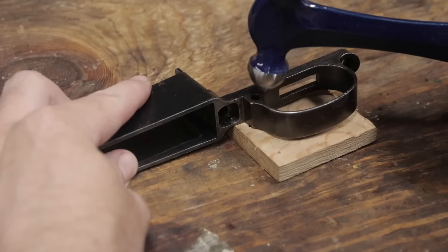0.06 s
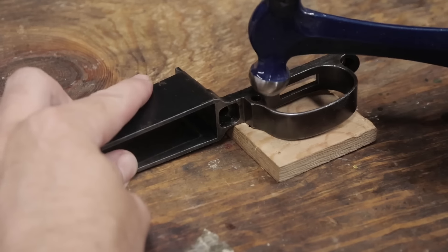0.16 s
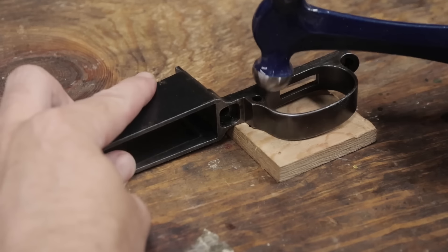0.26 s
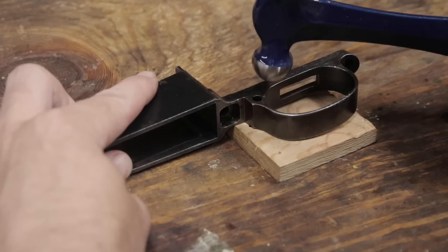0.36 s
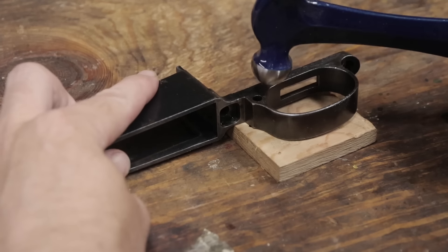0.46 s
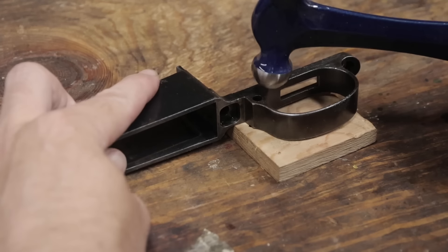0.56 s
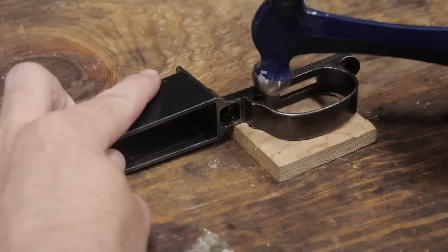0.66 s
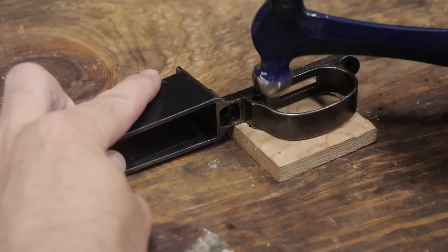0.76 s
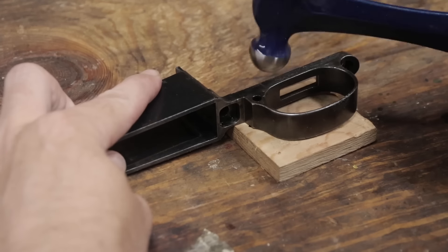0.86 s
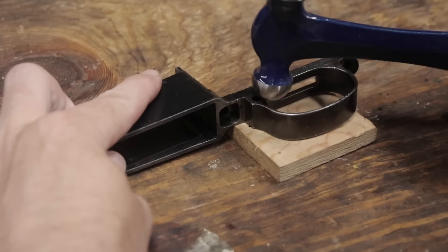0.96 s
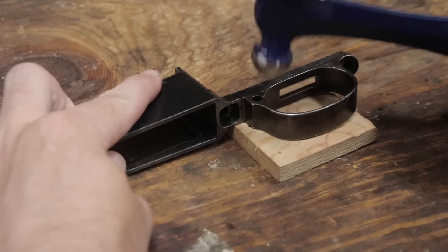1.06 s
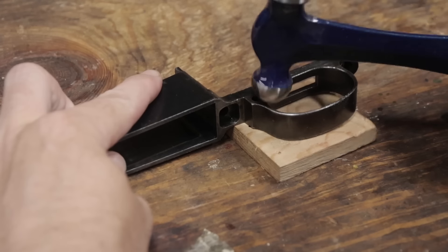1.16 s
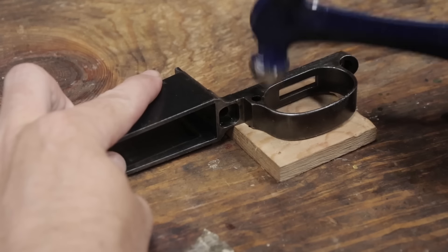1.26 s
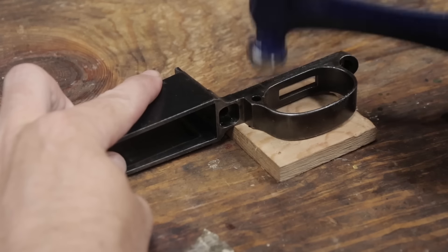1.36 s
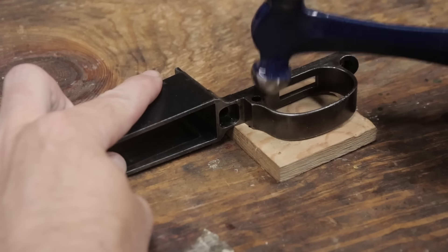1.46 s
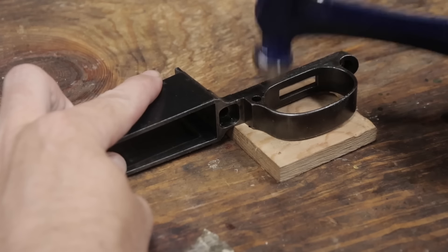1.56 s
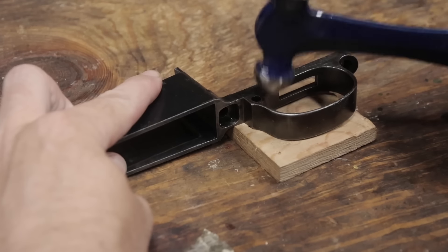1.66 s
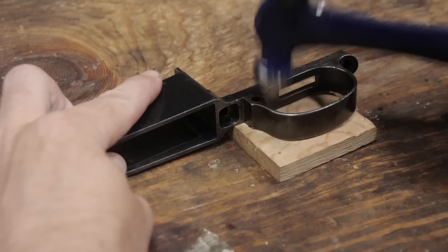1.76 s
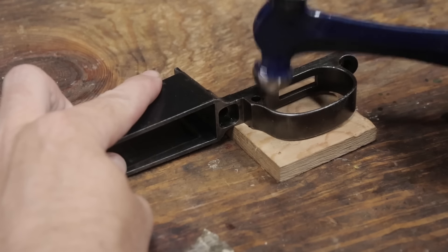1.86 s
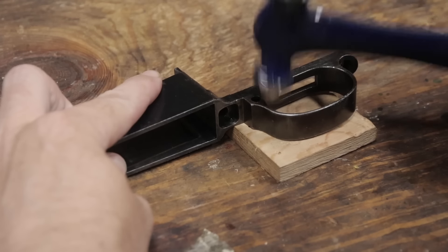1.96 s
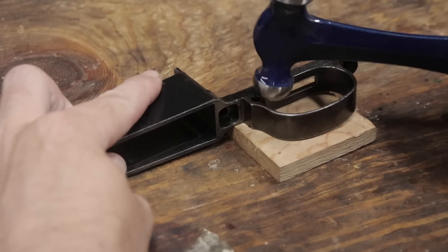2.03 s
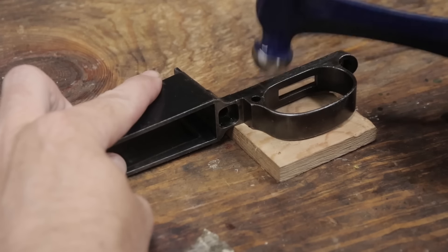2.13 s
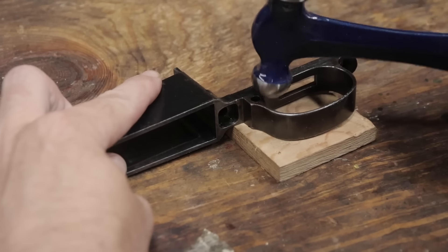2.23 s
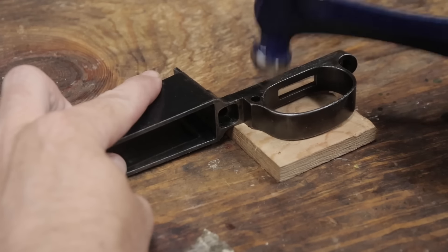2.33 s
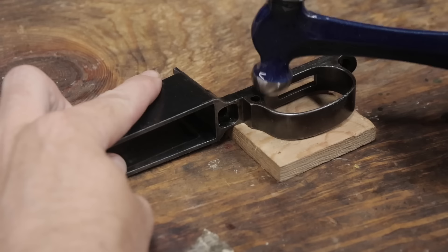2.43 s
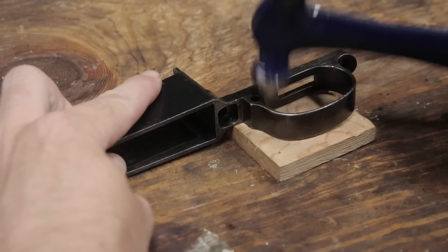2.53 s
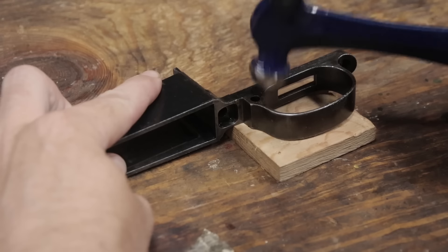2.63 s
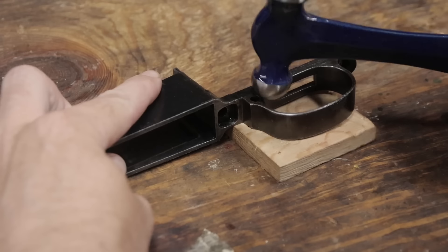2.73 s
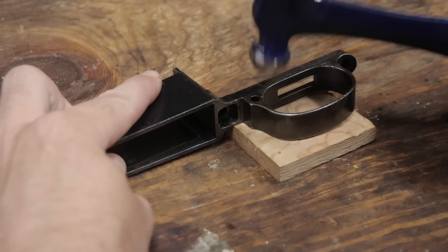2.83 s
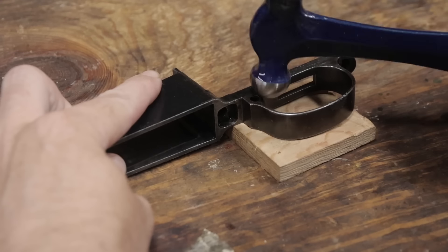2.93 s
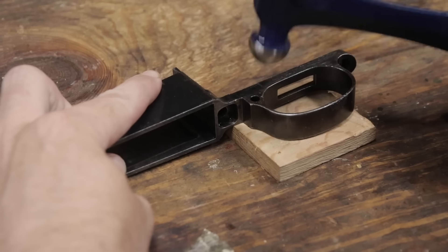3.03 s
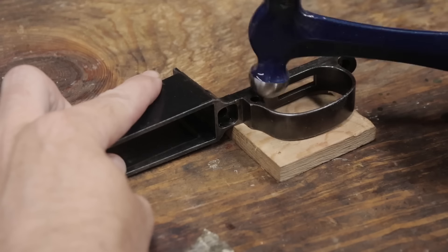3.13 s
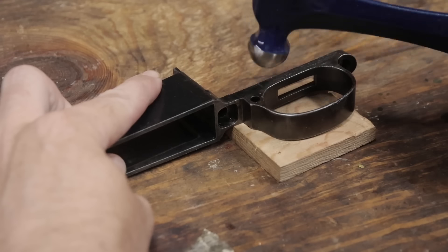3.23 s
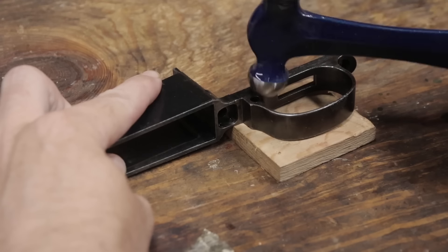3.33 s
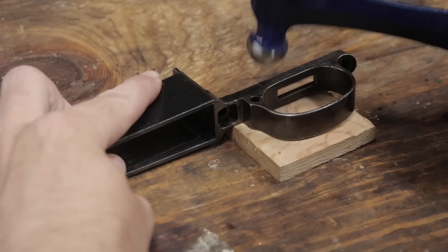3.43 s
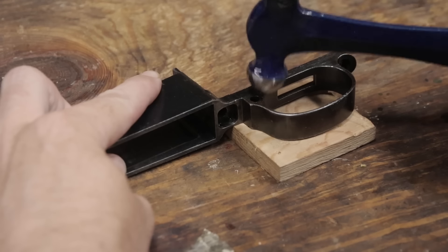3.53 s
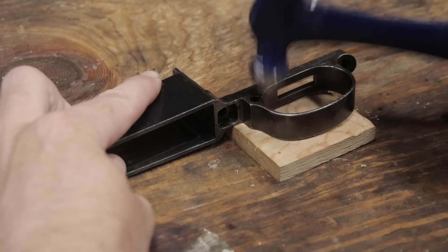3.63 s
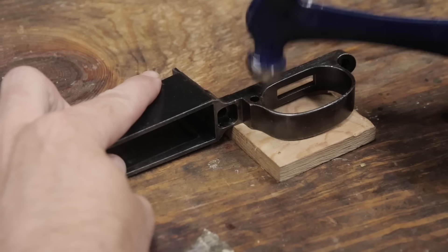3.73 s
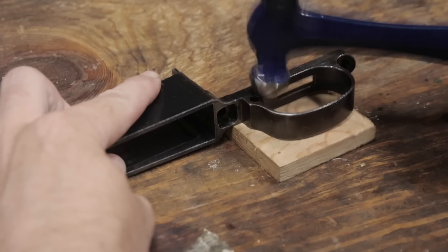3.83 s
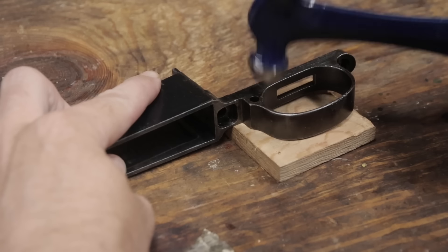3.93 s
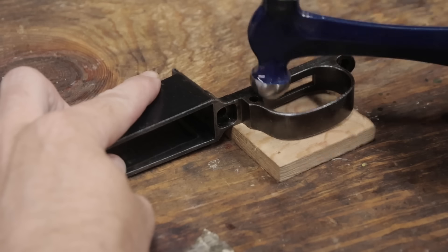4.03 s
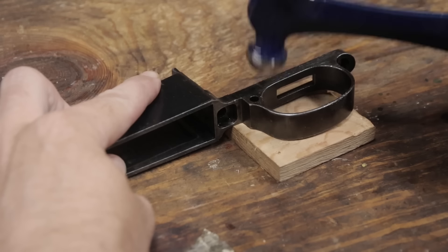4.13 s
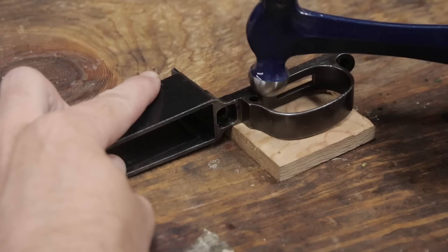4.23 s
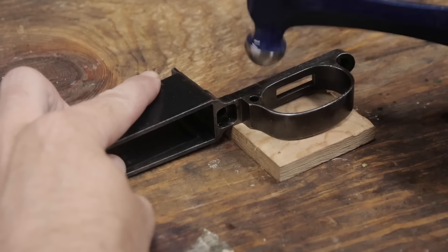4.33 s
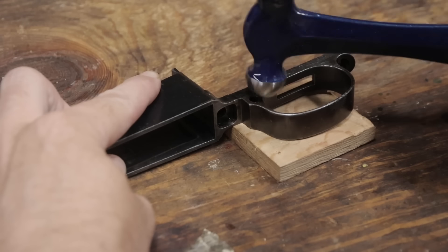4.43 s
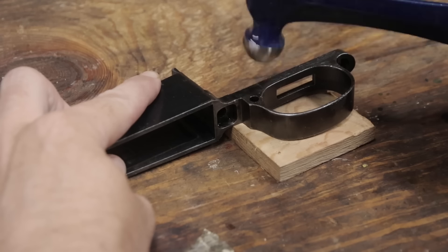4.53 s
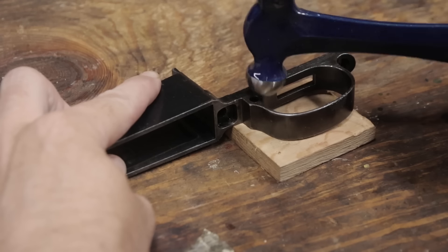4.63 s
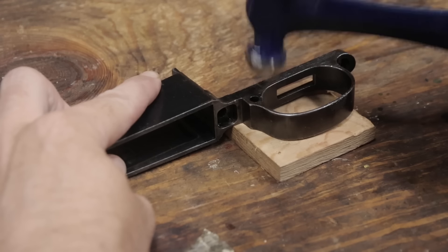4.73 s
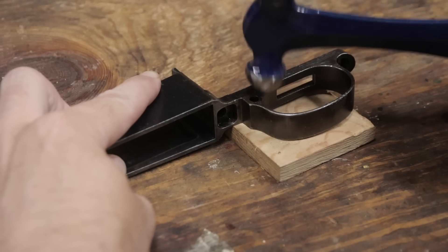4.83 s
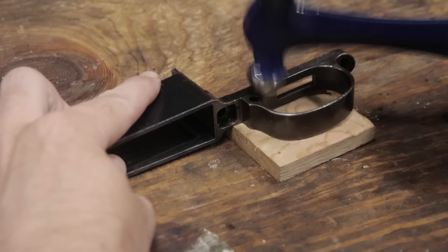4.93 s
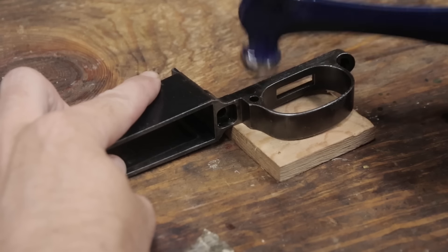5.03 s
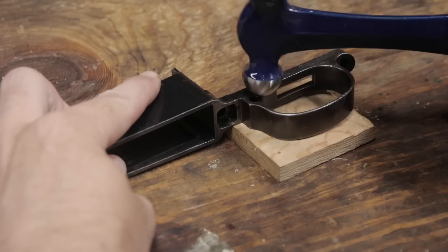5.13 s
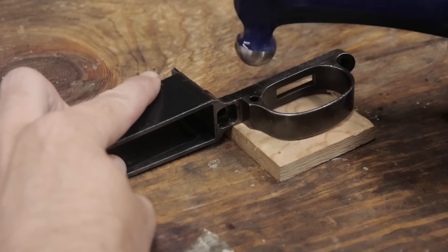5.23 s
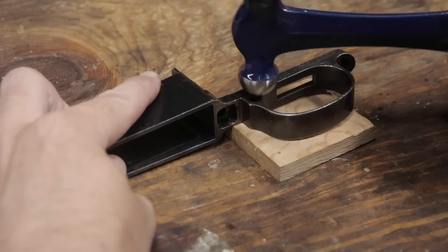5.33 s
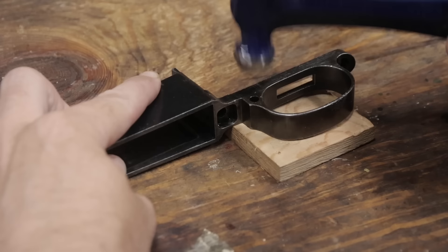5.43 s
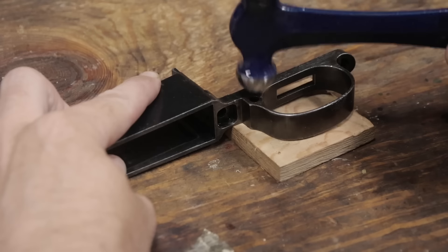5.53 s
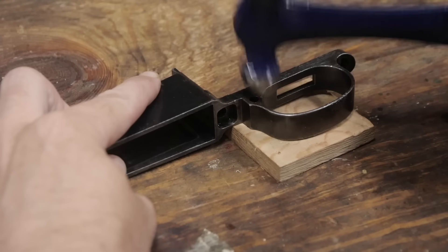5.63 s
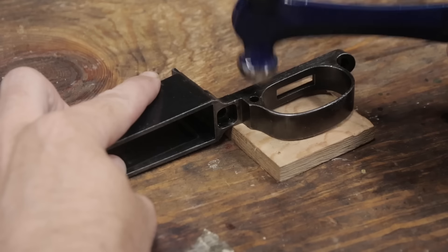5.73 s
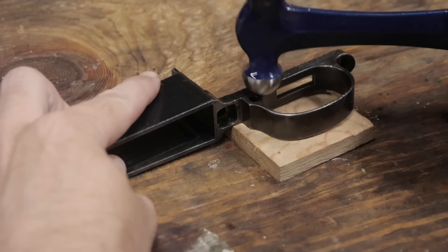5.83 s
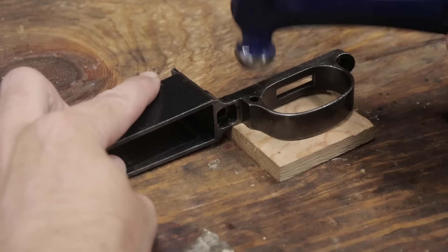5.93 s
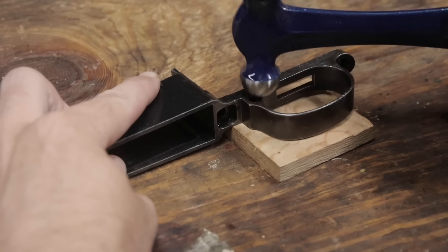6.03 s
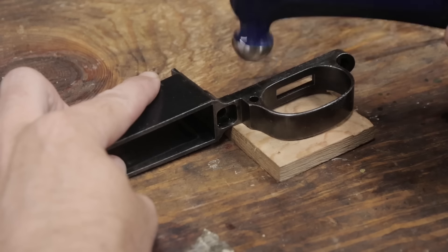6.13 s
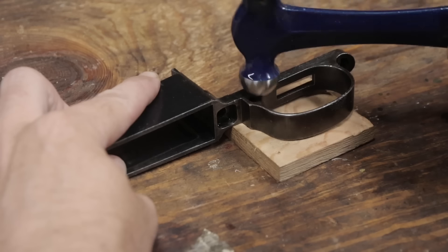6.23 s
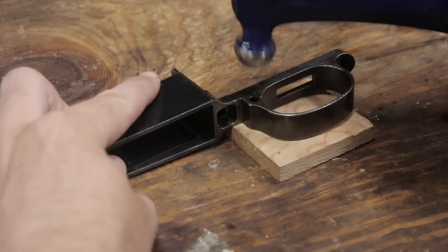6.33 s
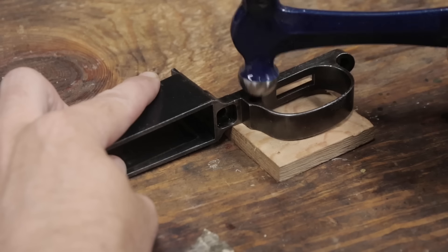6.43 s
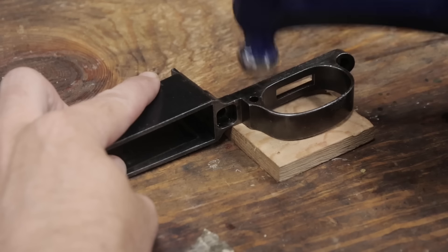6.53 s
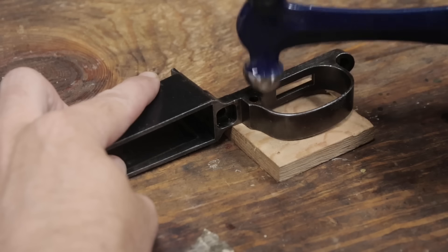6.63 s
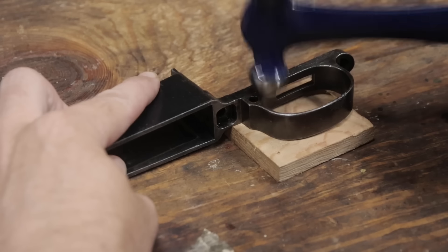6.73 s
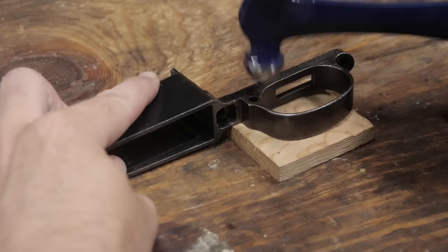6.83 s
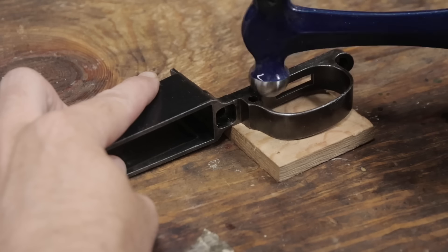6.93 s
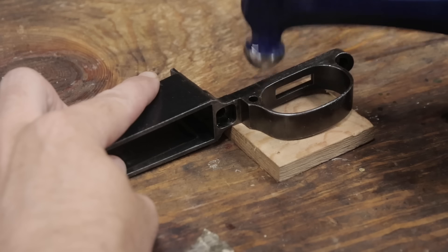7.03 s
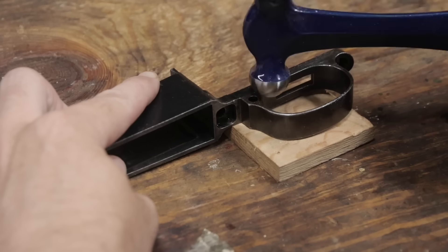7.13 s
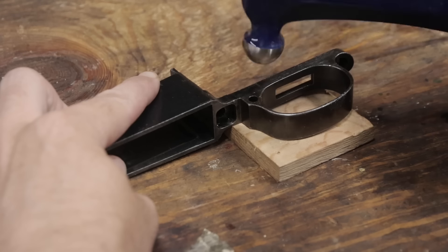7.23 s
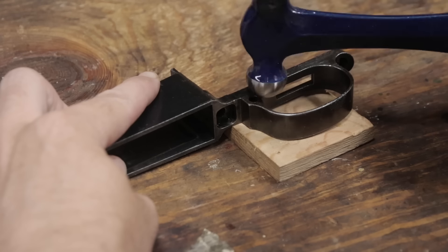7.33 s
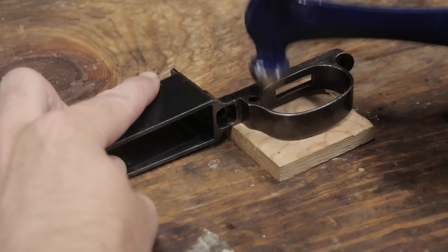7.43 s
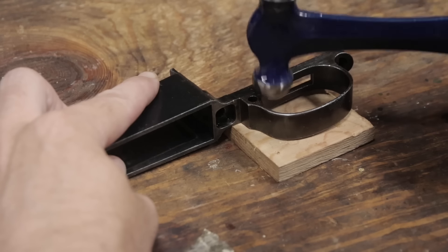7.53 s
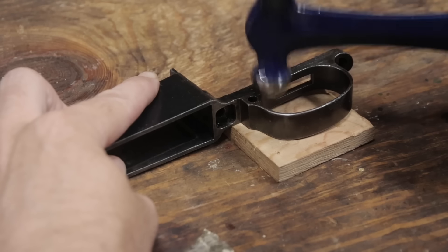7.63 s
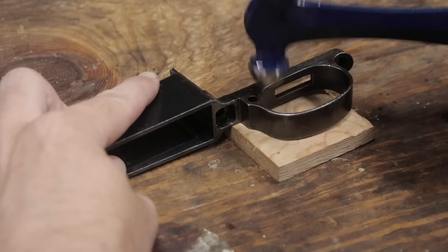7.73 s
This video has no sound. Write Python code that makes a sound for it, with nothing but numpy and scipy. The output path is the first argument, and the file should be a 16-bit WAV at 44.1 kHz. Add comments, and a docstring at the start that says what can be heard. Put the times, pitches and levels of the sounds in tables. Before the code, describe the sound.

After a faint scuff, a small hammer starts tapping a steel part held on a wood block and keeps going at about five blows a second. Each blow is a sharp metallic clack with a thump from the workbench and a thin, faint ping. Some taps are duller, others clank, and the last few are lighter. The sound is close, in a small workshop with a low hum.

```python
"""Hammer taps on steel at a workbench

A small ball-peen hammer taps about five times a second on a steel gun part held on a wood block.
Each impact excites normal modes: the bench top thumps, the steel clacks and rings, and the hammer
head keeps a thin ping. Before the first blow the part scuffs faintly on its block. The sound is
close and nearly mono, in a small reverberant workshop with a low hum."""
import sys
import numpy as np
from scipy import signal
from scipy.fft import rfft, irfft
from scipy.io import wavfile
from scipy.ndimage import uniform_filter1d, minimum_filter1d

SR = 44100
rng = np.random.default_rng(int(sys.argv[2]) if len(sys.argv) > 2 else 0)


def wav_out(sig):
    """Save sig, one row per channel (or a flat mono array), as 16-bit PCM at SR to the path in sys.argv[1]."""
    wavfile.write(sys.argv[1], SR, np.round(np.clip(np.atleast_2d(sig).T, -1, 1) * 32767).astype(np.int16))


N = 343045
TIME = np.arange(N) / SR
SIZE = 16384  # samples in the response to one blow
AGE, FREQ = np.arange(SIZE) / SR, np.fft.rfftfreq(SIZE, 1 / SR)


def undb(db):
    """Amplitude ratio of a level: a factor of ten for every 20 dB."""
    return 10 ** (np.asarray(db) / 20)


def curve(freq, points_hz, values):
    """Linear interpolation on a logarithmic frequency axis."""
    return np.interp(np.log(freq + 1), np.log(points_hz), values)


def decay(t60):
    """Exponential damping: 60 dB down after t60 seconds."""
    return np.exp(-np.log(1000) * AGE / t60)


def delay(ms):
    """A pure delay: phase lag proportional to frequency."""
    return np.exp(-2j * np.pi * FREQ * ms / 1000)


def rings(modes):
    """Free vibration: one damped sinusoid for each normal mode."""
    return np.array([undb(db) * np.cos(2 * np.pi * hz * AGE) * decay(t60) for hz, db, t60 in modes])


def diffuse(bands, count):
    """High modal overlap: dense modes merge into decaying noise bands. Returns count spectra."""
    bursts, centres = 0, [band[0] for band in bands]
    low_cut = FREQ ** 4 / (FREQ ** 4 + (0.89 * centres[0]) ** 4)
    for (_, db, t60), pick in zip(bands, np.eye(len(bands))):
        share = curve(FREQ, centres, pick) * low_cut
        noise = rfft(rng.standard_normal((count, SIZE)))
        burst = irfft(noise * np.sqrt(share)) * decay(t60)
        energy = np.sum(burst ** 2, axis=1, keepdims=True)
        bursts = bursts + undb(db) * burst * np.sqrt(share.mean() / energy)
    return rfft(bursts)


def varied(bands, count, common):
    """Partial coherence: count diffuse spectra share a common fraction of their power."""
    bursts = diffuse(bands, count + 1)
    return np.sqrt(common) * bursts[0] + np.sqrt(1 - common) * bursts[1:]


def causal(db):
    """Minimum phase: a response with these gains that rings only after the blow."""
    cepstrum = irfft(np.log(undb(db)))
    fold = np.concatenate([[1], np.full(SIZE // 2 - 1, 2), [1], np.zeros(SIZE // 2 - 1)])
    return np.exp(rfft(cepstrum * fold))


def add(track, sound, start_s):
    """Linear superposition: a sound adds to the track from its onset."""
    first = int(round(start_s * SR))
    track[first:first + len(sound)] += sound[:max(N - first, 0)]


# spectrum of the room air: (frequency [Hz], relative spectral density [dB])
AIR_SPECTRUM = [(20, -24), (45, -11), (70, 0), (110, -10), (160, -18), (270, -13), (340, -22), (680, -28),
                (890, -23), (1050, -35), (1900, -41), (6000, -51), (16000, -57)]

def background(air_db=-63, hum_hz=77, hum_db=-67.5):
    """Stationary ambient noise: broadband room air and a pure low hum, each set by its RMS level."""
    colour = undb(curve(np.fft.rfftfreq(N, 1 / SR), *np.transpose(AIR_SPECTRUM)))
    air = irfft(rfft(rng.standard_normal(N)) * colour, N)
    hum = np.sqrt(2) * np.sin(2 * np.pi * hum_hz * TIME)
    return undb(air_db) * air / air.std() + undb(hum_db) * hum


def scuff(bench_response, peak_s=0.291, half_width_s=0.025, gain_db=-62.5, cutoff_hz=600):
    """Sliding friction: the part shifts on its block, and dull noise drives the bench and the room."""
    rub = rng.standard_normal(N) * np.exp(-((TIME - peak_s) / half_width_s) ** 2)
    rub = signal.sosfilt(signal.butter(2, cutoff_hz, fs=SR, output="sos"), rub)
    room = 1 + diffuse(REVERBERATION, count=1)[0]
    return undb(gain_db) * signal.fftconvolve(rub, irfft(bench_response * room))[:N]


# modes of the bench top with the block on it: (frequency [Hz], level [dB], decay time T60 [s])
BENCH_MODES = [(58.6, -60, 0.56), (103.1, -31, 0.11), (126, -17, 0.094), (175.3, -32.5, 0.34),
               (205.8, -16, 0.063), (287, -22, 0.06), (338.1, -33.5, 0.26), (432.7, -29.5, 0.13),
               (526, -42.5, 0.25), (556.4, -36, 0.21), (649.5, -35.5, 0.23), (695.2, -24.5, 0.1),
               (756, -21.5, 0.031), (821.3, -32.5, 0.14), (883.4, -26, 0.1), (1056.5, -20.5, 0.053),
               (1140, -37.5, 0.085), (1233, -40, 0.094), (1277, -50, 0.026), (1343, -27.5, 0.039),
               (1580, -41, 0.038), (1656, -24, 0.025), (1645, -65, 0.071)]
# early reflections from nearby surfaces: (delay [ms], amplitude [re direct sound])
REFLECTIONS = [(4.07, 0.37), (10.89, 0.13)]

def bench(dispersion_ms=0.48, lowest_hz=50, highest_hz=1850):
    """Modal response of a plate: the spectrum of the bench top's thump, with its early reflections."""
    # bending waves are slower at low pitch: group delay is dispersion_ms at 1 kHz, going as 1 / sqrt(f)
    bending = np.exp(-4j * np.pi * dispersion_ms * np.sqrt(FREQ / 1000))
    echoes = 1 + sum(share * delay(ms) for ms, share in REFLECTIONS)
    # the board hardly radiates deep bass, and the wood block cushions the treble
    radiation = (1j * FREQ / (1j * FREQ + lowest_hz)) ** 2
    cushion = signal.butter(6, highest_hz, fs=SR, output="sos")
    vibration = signal.sosfilt(cushion, rings(BENCH_MODES).sum(axis=0))
    return -rfft(vibration) * bending * echoes * radiation


# workshop reverberation: (frequency [Hz], level re direct sound [dB], decay time T60 [s])
REVERBERATION = [(58.4, 0, 0.31), (165, -16, 0.35), (370, -4.5, 0.2), (666, -10, 0.19), (1110, -17, 0.25),
                 (2380, -8.5, 0.2), (5700, -10.5, 0.21), (9100, -12.5, 0.17), (14000, -12, .12)]

def workshop(count):
    """Direct plus diffuse field: the moving arm and hammer change the reflected paths for each blow."""
    return 1 + varied(REVERBERATION, count, common=0.33) * delay(ms=7)


# crack of the contact, a crowd of short modes: (frequency [Hz], level [dB], decay time T60 [s])
CRACK_BANDS = [(353, 2.5, 0.09), (610, 14.5, 0.26), (970, -2, 0.017), (1660, 12, 0.037), (1764, -32, 0.02),
               (2233, 12, 0.049), (3480, 12, 0.055), (3994, 0, 0.057), (5220, 1.5, 0.054),
               (6860, -15, 0.11), (8700, -5.5, 0.051), (10020, -14, .04), (13000, -17, 0.04),
               (15500, -59, .04)]
# brief click of steel meeting steel: (frequency [Hz], level [dB], decay time T60 [s])
CLICK_BANDS = [(2570, 14, 0.0075), (3310, -0.5, 0.011), (4070, -13.5, 0.0047), (12100, -34.5, 0.0087)]

def clack(count, width_db=-9, wide_above_hz=4500):
    """Impact transient: a brief contact excites a broad band. Returns mid and side spectra per blow."""
    mid = varied(CRACK_BANDS, count, common=0.62) + varied(CLICK_BANDS, count, common=0.1)
    # only the shortest waves of the crack differ between left and right
    side = diffuse(CRACK_BANDS, count) * undb(width_db) / (1 + (wide_above_hz / (FREQ + 1)) ** 8)
    return mid, side


# modes of the steel part, damped by the hand: (frequency [Hz], level [dB], decay time T60 [s])
STEEL_MODES = [(2292, -40, .08), (2505, -41, .06), (2640, -42, .05), (2788, -41, .05), (3103, -39, .05),
               (3230, -40, .05), (3421, -39, .055), (4583, -51, .04), (5330, -54, .12), (5560, -48, .045),
               (5964, -48, .055), (6230, -53, .07), (8260, -50, .06), (8790, -40, .055), (9250, -47, .06),
               (9375, -45, .06), (9570, -46, .07), (10040, -44, .06), (10365, -53, .13), (11060, -52, .11),
               (11585, -52, .07), (12420, -52, .08), (14915, -58, .09)]

def steel(scatter_db=4.5):
    """Modal excitation: the landing spot gives each mode a random strength and sign in the spectrum."""
    strengths = undb(scatter_db * rng.standard_normal(len(STEEL_MODES)))
    signs = rng.choice([-1, 1], len(STEEL_MODES))
    return rfft((strengths * signs) @ rings(STEEL_MODES))


# colour of a hard blow on the firmly seated part: (frequency [Hz], gain [dB])
HARD_COLOUR = [(30, -10), (110, 0), (280, 0.96), (450, -1), (700, 0.5), (1100, 0.37), (1650, 3),
               (1950, -5.5), (2400, -4.5), (3100, -6), (6000, 8.5), (12400, 5.5), (13200, 1)]
# treble loss of the softest contact: (frequency [Hz], gain [dB])
SOFT_COLOUR = [(500, 0), (1300, -5), (2400, -3), (6000, -25), (10000, -28)]
# resonances of the loosely seated part: (frequency [Hz], width [Hz], gain when fully loose [dB])
CLANK_BANDS = [(895, 270, 4), (1264, 130, 8), (2560, 165, 7.5), (3220, 520, 12.5), (4540, 200, 9.5),
               (9100, 5500, 2)]

def blow_colour(softness, looseness):
    """Contact time limits bandwidth: a soft, longer blow is duller; a loose part clanks. Gain in dB."""
    hard = curve(FREQ, *np.transpose(HARD_COLOUR))
    loss = curve(FREQ, *np.transpose(SOFT_COLOUR))
    clank = sum(db * np.exp(-2 * ((FREQ - hz) / width) ** 2) for hz, width, db in CLANK_BANDS)
    return hard + softness * loss + looseness * clank


# hammer blows: (time [s], strength [dB], contact softness [0-1], part looseness [0-1], ping gain [dB])
BLOWS = [(0.8052, -21, 0.69, 0.7, -30), (1.0477, -4, 1, 0.0, -7), (1.2801, -0.5, 0.29, 0.0, 1),
         (1.514, 2, 0.9, 0.06, 1.5), (1.7082, -2, 0.42, 0.8, 10), (1.899, 1.5, 0.33, 0.12, 11),
         (2.094, -1.5, 0.83, 0.0, -8), (2.2852, -1.0, 0.28, 0.66, 4.5), (2.4803, 0.5, 0.14, 0.36, 9.5),
         (2.6629, -1, 0.71, 0.36, -7.5), (2.8415, -4, 0.12, 0.7, 5.5), (3.0246, 1.5, 0.18, 0.1, 10),
         (3.2161, 6, 0.4, 0, 6), (3.403, 2.2, 0.41, 0.0, -6), (3.5921, 1.5, 0.2, 0.18, 2),
         (3.768, 2, 0.27, 0, 7.5), (3.9536, 0.5, 0.2, 0.92, 8), (4.1481, -0.1, 0.22, 0.7, 0),
         (4.3309, 0.0, 0.16, 0.85, 3), (4.5137, 3, 0.26, 0.05, -1), (4.7003, 1.5, 0.14, 0.15, 4),
         (4.8812, 1.2, 0.07, 0, 8.5), (5.058, -1.5, 0.29, 1.0, -16), (5.234, 0.9, 0.26, 0.35, 5.5),
         (5.4053, 3.0, 0.1, 0.04, -9), (5.585, 2.4, 0.06, 0.0, 4), (5.7648, -0.5, 0.07, 0.04, -16),
         (5.9456, -1.3, 0.16, 0.53, -7), (6.128, 1.5, 0.03, 0, 1), (6.3175, 2.0, 0.01, 0.05, -1.5),
         (6.4981, 2.9, 0.59, 0.2, -4), (6.685, 2.5, 0.4, 0.0, -2), (6.862, -4.5, 0.32, 0.82, 1.5),
         (7.0445, -3, 0.29, 0.83, 3.5), (7.2323, -4, 0.6, 0.93, -0.5), (7.417, -0.5, 0.23, 0, 0),
         (7.58, -6.5, 0.52, 0.3, 5), (7.7628, -9, 0.63, 0.54, 0)]

def taps(thump):
    """Source and filter: each blow rings bench and steel, coloured by contact, seating and room."""
    mid, side = np.zeros(N), np.zeros(N)
    clacks, side_clacks = clack(len(BLOWS))
    rooms = workshop(len(BLOWS))
    lag = delay(ms=0.7)  # the steel sounds as the contact force peaks, just after the first touch
    fade_out = np.clip(10 * (1 - AGE / AGE[-1]) - 1, 0, 1)
    for i, (start, strength_db, softness, looseness, _) in enumerate(BLOWS):
        metal = (steel() + clacks[i]) * lag
        path = rooms[i] * causal(strength_db + blow_colour(softness, looseness))
        add(mid, irfft((thump + metal) * path) * fade_out, start)
        add(side, irfft(side_clacks[i] * lag * path) * fade_out, start)
    return np.array([mid + side, mid - side])


def hammer_ping(mode_hz=3547, base_db=-53, t60_s=0.56):
    """Free vibration: the rebounding head rings in one mode until the next blow stops it."""
    track = np.zeros(N)
    note = np.sin(2 * np.pi * mode_hz * AGE) * decay(t60_s)
    gaps = np.diff([blow[0] for blow in BLOWS] + [np.inf])
    for (start, *_, ping_db), gap in zip(BLOWS, gaps):
        add(track, undb(base_db + ping_db) * note * (AGE < gap), start)
    return track


def scene():
    """Superposition: the pressures of taps, pings, scuff and background add."""
    thump = bench()
    return taps(thump) + hammer_ping() + scuff(thump) + background()


def record(dry, ceiling=0.32, window_samples=65, cutoff_hz=15700):
    """Peak and band limiting: a look-ahead gain holds the loudest peaks; a low-pass cuts the top."""
    allowed = ceiling / np.maximum(abs(dry).max(axis=0), ceiling)
    gain = uniform_filter1d(minimum_filter1d(allowed, window_samples), window_samples)
    low_pass = signal.ellip(8, 0.2, 80, cutoff_hz, fs=SR, output="sos")
    return signal.sosfilt(low_pass, dry * gain)


dry = scene()
out = record(dry)
wav_out(out)
```